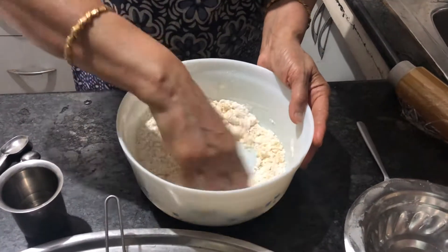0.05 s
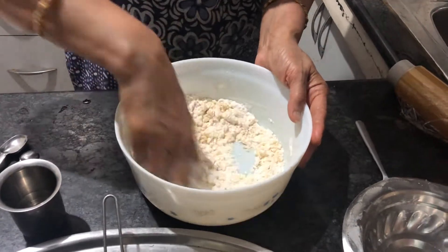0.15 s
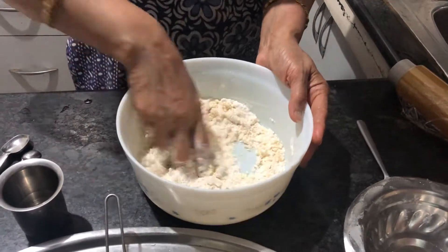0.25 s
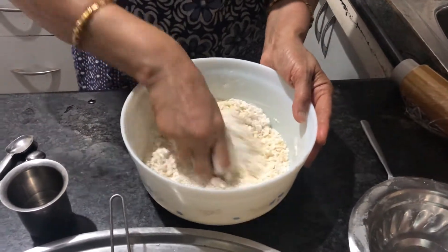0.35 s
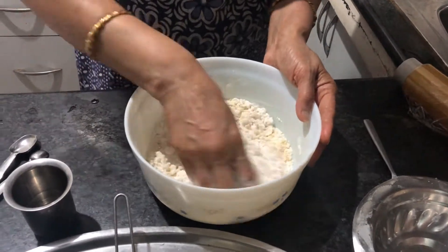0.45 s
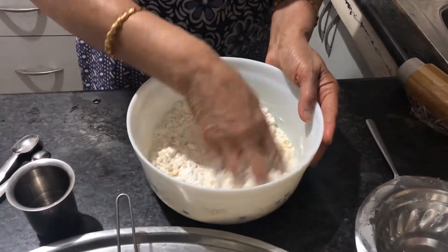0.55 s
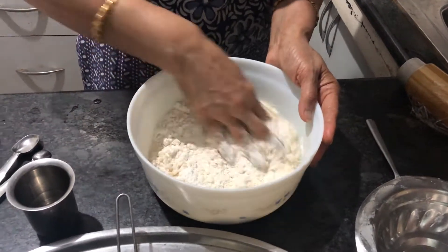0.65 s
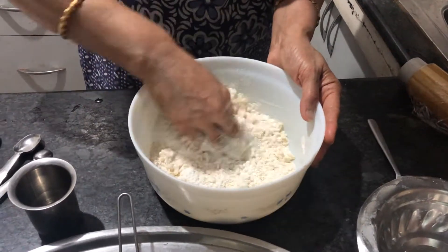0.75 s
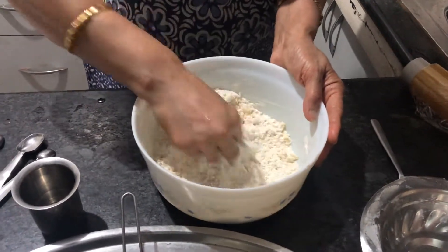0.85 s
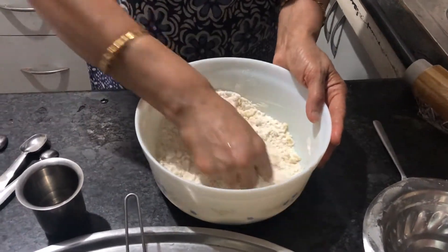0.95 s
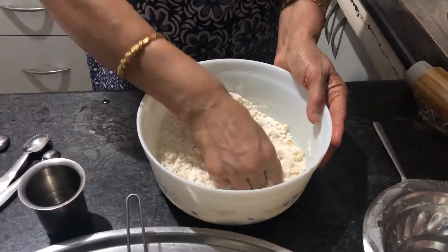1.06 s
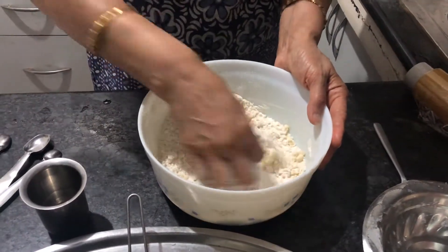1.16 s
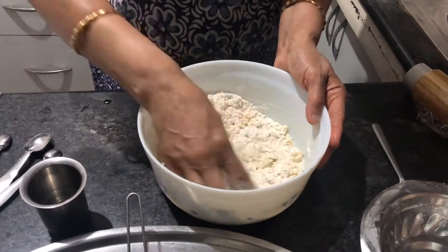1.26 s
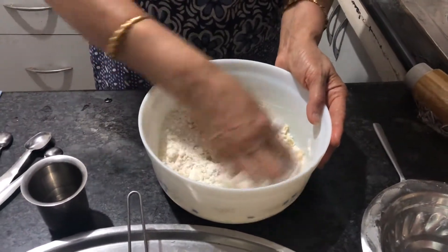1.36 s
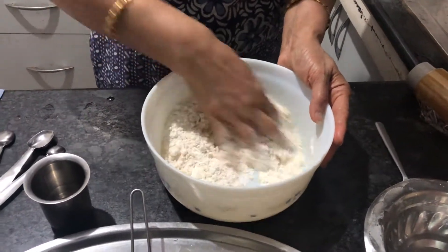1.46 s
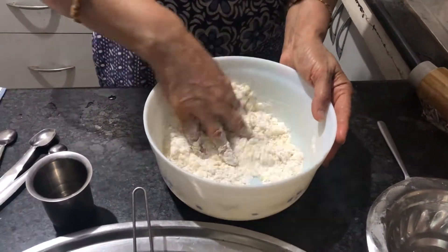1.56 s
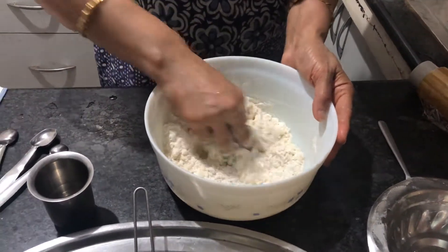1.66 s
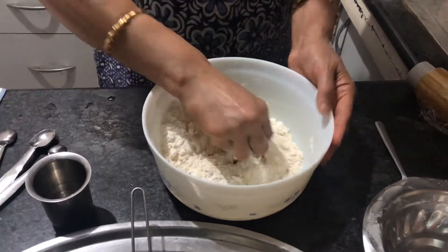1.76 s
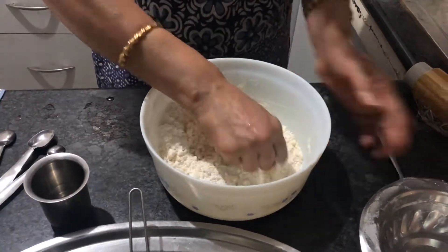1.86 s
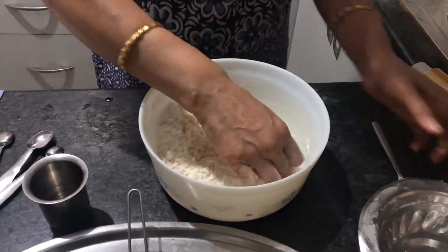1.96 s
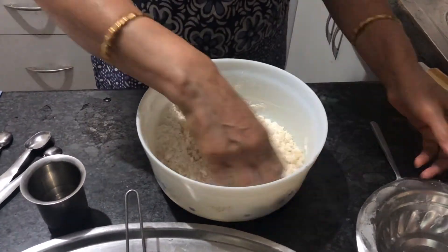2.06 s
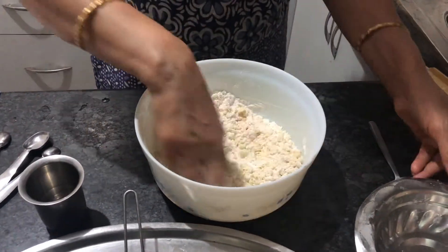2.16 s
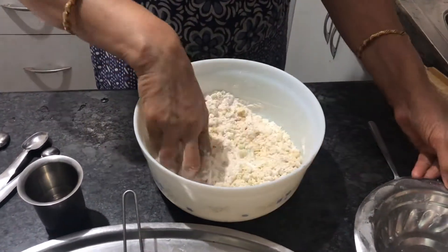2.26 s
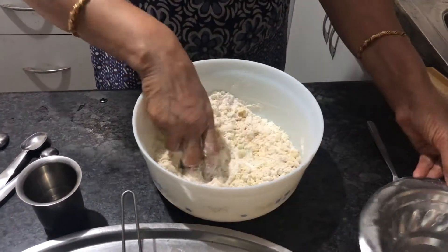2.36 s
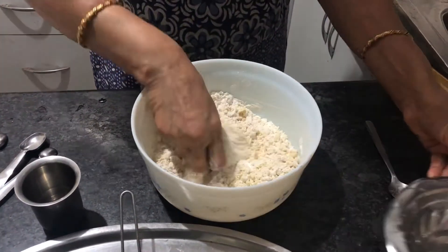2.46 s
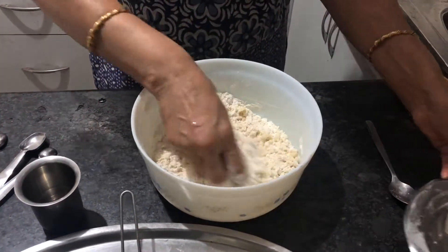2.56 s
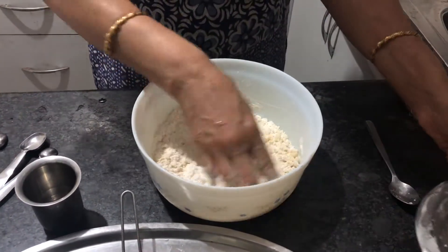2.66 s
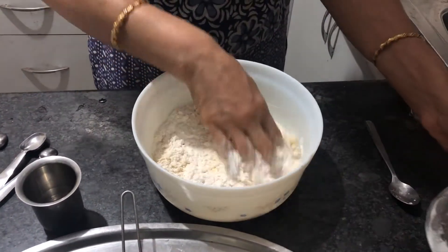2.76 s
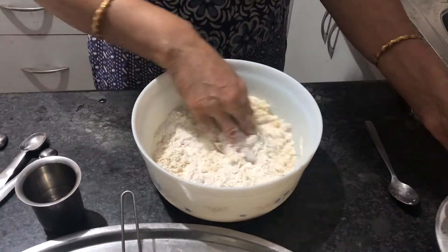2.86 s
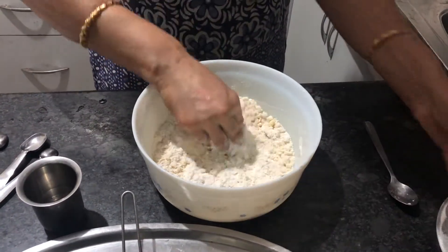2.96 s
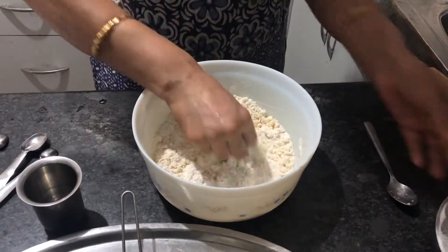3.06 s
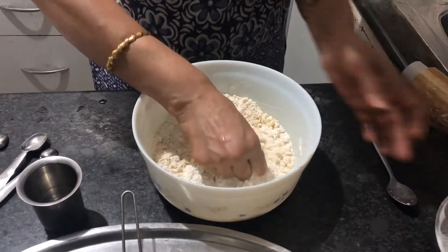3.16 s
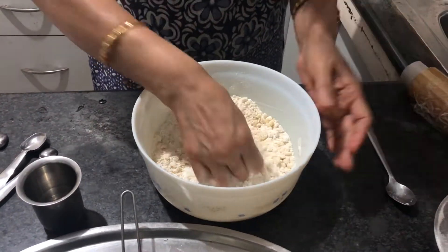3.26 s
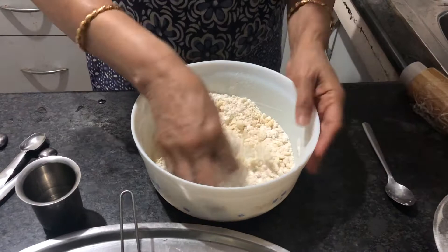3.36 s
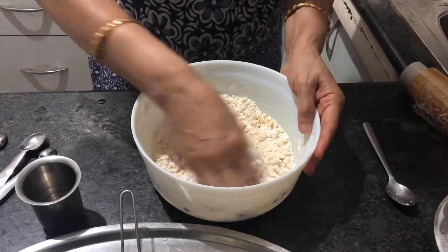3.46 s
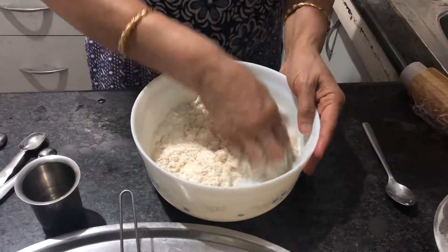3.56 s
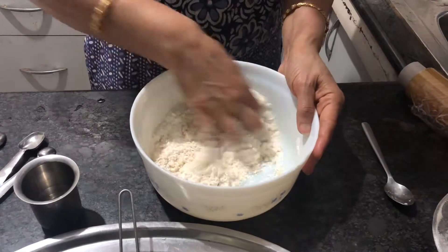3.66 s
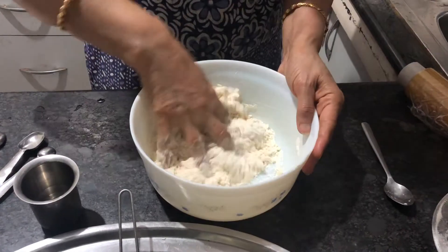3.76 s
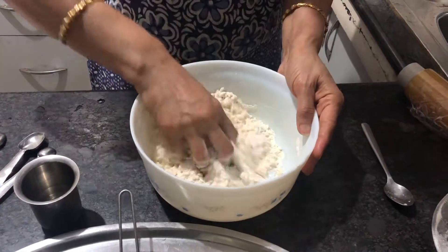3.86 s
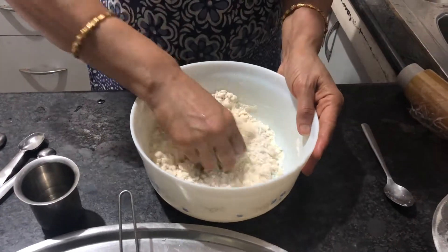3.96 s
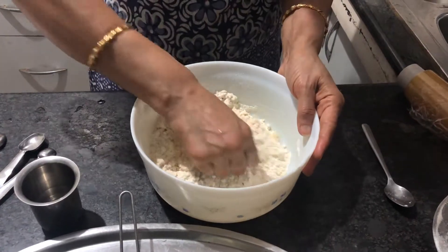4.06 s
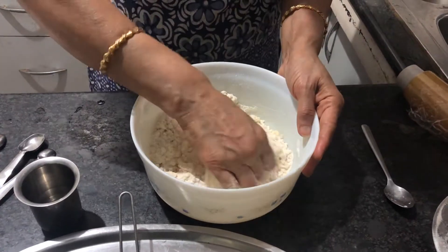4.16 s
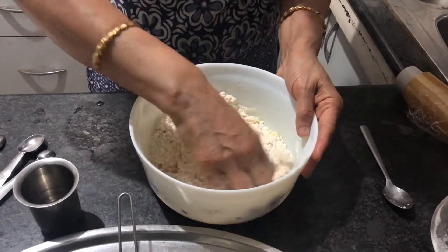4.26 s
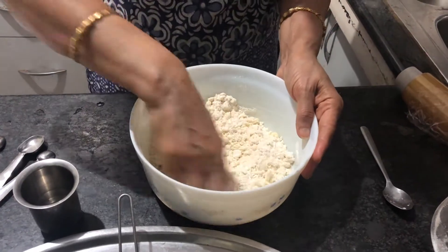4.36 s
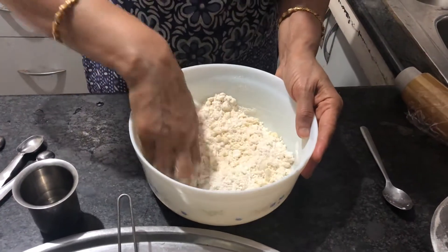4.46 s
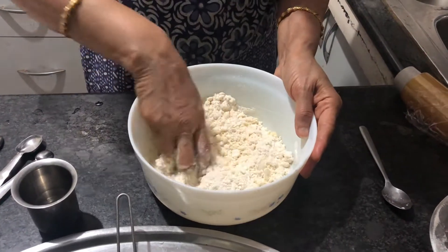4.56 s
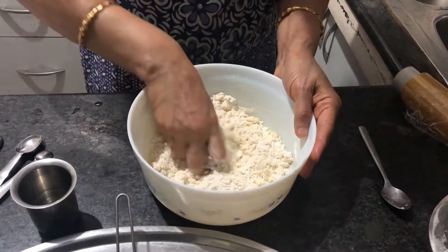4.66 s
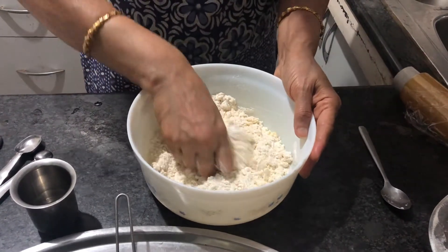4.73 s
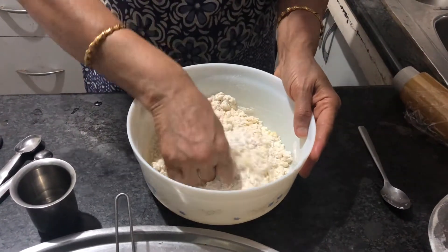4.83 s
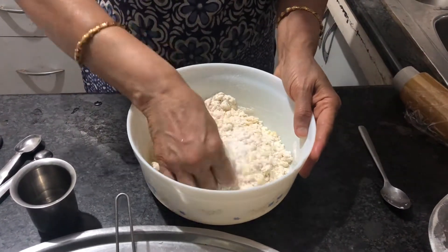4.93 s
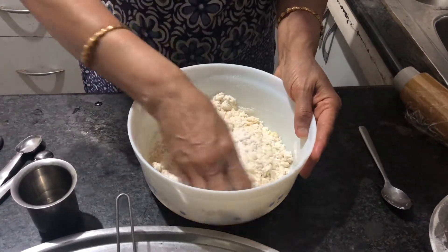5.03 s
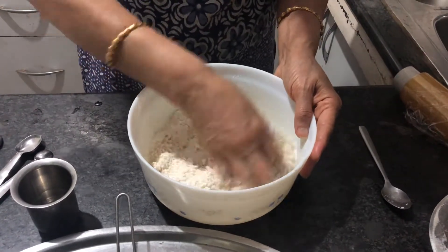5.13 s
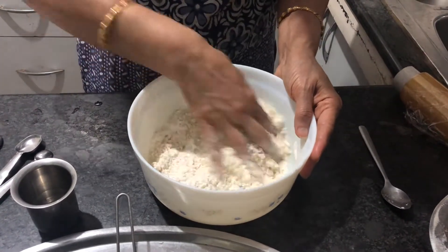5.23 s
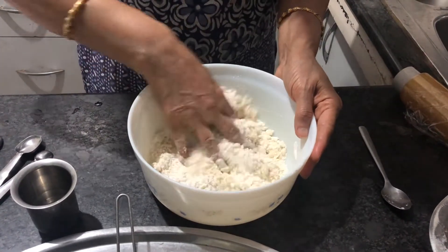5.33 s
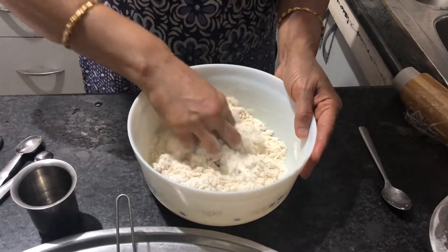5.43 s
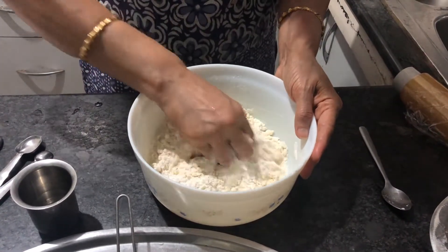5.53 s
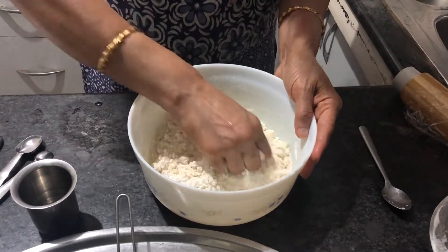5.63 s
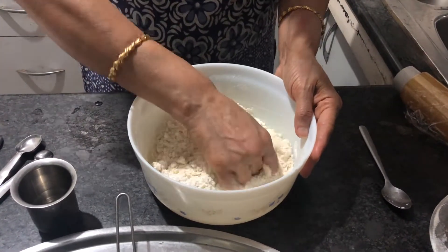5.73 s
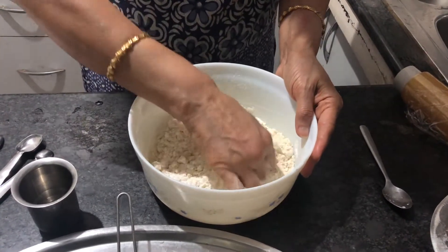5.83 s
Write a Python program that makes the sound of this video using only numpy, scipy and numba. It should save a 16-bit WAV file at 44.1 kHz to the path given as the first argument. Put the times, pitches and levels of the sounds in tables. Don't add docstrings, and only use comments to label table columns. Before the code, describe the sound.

Quiet crumbly rustling in a bowl, a sudden bright metal clank and chattering drag on a counter, then more rubbing with hard ceramic taps.

```python
import sys
import numpy as np
from scipy import signal
from scipy.fft import rfft, irfft
from scipy.io import wavfile
from numba import njit

SR = 44100
rng = np.random.default_rng(int(sys.argv[2]) if len(sys.argv) > 2 else 0)


def voltage_ratio(decibels):
    exponent = np.asarray(decibels, float) / 20
    return 10 ** exponent


def wrap_up_sound(samples):
    columns = np.atleast_2d(samples).T
    tamed = np.clip(columns, -1, 1)
    steps = np.round(tamed * 32767).astype(np.int16)
    wavfile.write(sys.argv[1], SR, steps)


N = 259749


# (time [s], hold [s], rub on the wall [dB], dry hiss over the rub [dB])
STROKES = [(0.0, 0.081, -73, -3), (0.156, 0.098, -79.5, -0.5), (0.33, .05, -86, 2), (0.6, .05, -83.5, 4.5),
           (0.683, .12, -75.5, 6), (0.935, 0.067, -80, 8.5), (1.061, .03, -88.5, 10),
           (1.241, 0.061, -81, -1.5), (1.353, 0.12, -73, 6), (1.552, .04, -68, 0.5), (1.717, .02, -68, -4),
           (1.8, 0.027, -87.5, 9.5), (2.02, .02, -88, 1.5), (2.12, .07, -85, 4.5),
           (3.018, 0.018, -80, -1.5), (3.117, 0.088, -81.5, 5), (3.381, 0.061, -73.5, -6),
           (3.479, .19, -68, 1), (3.78, .09, -66.5, 1), (3.893, 0.013, -51.5, 0.5), (4.058, 0.023, -87, 5),
           (4.351, .1, -80, 4), (4.481, 0.038, -69.5, 0), (4.57, .04, -72.5, 0.9), (4.633, .035, -63, 0.5),
           (4.83, 0.035, -90.5, 8), (5.106, 0.098, -72.5, 5.5), (5.23, 0.095, -81, -0.4),
           (5.39, 0.089, -66.5, -6), (5.5, .25, -74, -5)]
# (time [s], level [dB])
HEAP = [
    [(0.0, -69), (0.1, -67), (0.55, -73.5), (1.44, -66.5), (2.09, -71.5), (2.18, -75)],
    [(3.0, -67.5), (3.14, -77), (3.32, -76.5), (3.51, -66.5), (4.29, -72.5), (4.61, -69), (5.25, -73),
     (5.6, -64), (5.78, -70.5), (5.89, -78)],
]
# (frequency [Hz], width [Hz], level [dB])
BOWL_TONES = [(2010, 150, 1), (3390, 230, -9.5), (4194, 80, 0.5), (4980, 370, -7), (5490, 200, 0.5)]
# (frequency [Hz], width [Hz], level [dB])
GLAZE_TONES = [(6020, 180, -6), (6812, 90, 2.5), (7150, 90, -2), (7200, 100, -8), (7970, 460, -8.5),
               (7820, 46, -11.5), (8710, 760, -14.5)]
# (frequency [Hz], width [Hz], level [dB])
CRUMB_TONES = [(10470, 890, -18.5), (11300, 100, -21), (10610, 180, -6), (12020, 120, -0.5),
               (12400, 520, -5), (12500, 350, 1.5), (13500, 420, -8), (13900, 290, -4), (15000, 250, -1.5),
               (15400, 220, 8)]
# (frequency [Hz], width [Hz], level [dB])
HEAP_TONES = [(377, 40, -0.5), (490, 170, -1), (743.6, 110, -1.5), (1700, 300, -2.5), (2250, 160, -9.5),
              (2970, 690, -11.5), (5100, 970, -20)]


def flour():
    power = passes(STROKES, rise_s=0.061, sag_db_s=29, fall_s=0.092, quiet_db=-100)
    rub_db, hiss_db = np.transpose(STROKES)[2:]
    glaze_db = rub_db - 1 + 0.17 * hiss_db
    force = grit(2.2, 250) * voltage_ratio(1.5 * walk(30))
    wall = scrape(force, total_db(power, rub_db), BOWL_TONES, 4.5, 16, wander=0.025)
    glaze = scrape(force, total_db(power, glaze_db), GLAZE_TONES, 4.5, 14, wander=0.03)
    hiss = scrape(force, total_db(power, rub_db + hiss_db), CRUMB_TONES, 6.0, 30, wander=0.035)

    heap_s, heap_db = np.transpose(sum(HEAP, []))
    heap_level = np.interp(np.arange(N) / SR, heap_s, heap_db, left=-150, right=-150) - 5.0
    heap = scrape(grit(1.3, 36), heap_level, HEAP_TONES, 2.9, 16)
    return wall + glaze + hiss + heap


# (time [s], hold [s], force [dB], base contact over force [dB], wall over force [dB])
SLIDES = [
    (2.241, 0.043, -52, -7.5, -4),
    (2.334, 0.022, -43, -21, 3.5),
    (2.363, 0.024, -32.5, -4, -9),
    (2.409, 0.098, -32.5, 4.5, 0.8),
    (2.538, 0.08, -41.5, 1.5, 0),
    (2.659, .06, -48.5, -12, -6.5),
    (2.729, 0.095, -43, -17, 2),
    (2.863, 0.028, -48, -12, -9),
]
# (frequency [Hz], width [Hz], level [dB])
BASE_TONES = [(523.4, 40, -8), (603, 33, -16.5), (752, 92, -11.5), (907, 24, -8.5), (1032, 10, -4),
              (1026, 29, 4), (1085.5, 28, 6), (1233, 22, -12)]
# (frequency [Hz], width [Hz], level [dB])
WALL_TONES = [(1580, 7.7, -4.5), (1699, 97, -10), (1734.6, 20, -1.5), (1958, 37, -16)]
# (frequency [Hz], width [Hz], level [dB])
RIM_TONES = [(2470, 60, -7), (2793, 17, -19), (3262, 13, -4), (3319, 50, -2.5), (3883, 13, -6.5),
             (4283, 75, -3.5), (4513, 76, -1), (4500, 75, -6.5), (4991, 54, 1.5), (5630, 28, 0),
             (5734, 96, -3), (5850, 97, -10.5), (6290, 56, -9.5), (6220, 74, -15.5)]
# (frequency [Hz], width [Hz], level [dB])
GRIT_TONES = [(8197, 41, 0), (9330, 150, -3), (9600, 130, -16), (10400, 25, 0.5), (10860, 43, -1),
              (15500, 37, -0.5)]
# (frequency [Hz], width [Hz], level [dB])
DUST_TONES = [(4900, 2600, 0.9), (7600, 1500, -2.5), (10400, 2700, -2.5), (14000, 3000, -1.5)]
# (time [s], peak [dB], centre [Hz], spread [octaves], share of full decay [1])
CLINKS = [
    (2.207, -45, 5150, 0.056, 1),
    (2.356, -18.5, 1863, 0.36, 1.1),
    (2.361, -18.5, 4560, 0.25, 0.15),
    (2.362, -30, 2793, .05, 1.6),
    (2.874, -29.5, 1662, 0.2, 0.36),
    (2.874, -35.5, 4610, 0.24, 0.62),
    (2.918, -39.5, 1290, 0.13, 0.86),
    (2.876, -50, 3967, .03, 1.7),
]
# (frequency [Hz], time to fall 60 dB [s])
STEEL_RING = [(1280, 0.18), (1620, 0.042), (1750, 0.13), (1970, 0.087), (2793, 0.21), (3310, .15),
              (3967, 0.21), (4300, 0.2), (4548, 0.14), (5040, 0.11), (5640, 0.45)]


def dish():
    power = passes(SLIDES, rise_s=0.05, sag_db_s=22.5, fall_s=0.1, quiet_db=-87)
    start, hold, force_db, base_db, wall_db = np.transpose(SLIDES)
    grit_db = -11.5 + 9.5 * np.exp((start[0] - start) / 0.15)
    drag = slice(int(2.1 * SR), int(3.3 * SR))
    base = total_db(power, force_db + base_db)[drag]
    wall = total_db(power, force_db + wall_db)[drag]
    rim = total_db(power, force_db)[drag]
    top = total_db(power, force_db + grit_db)[drag]
    force = grit(2.0, 150, size=len(rim))
    crowd_hz = np.linspace(7150, 15600, num=30) + 150 * rng.standard_normal(size=30)
    crowd = [(hz, 45, -3) for hz in crowd_hz]

    out = blows(lasting(CLINKS, 9.0), STEEL_RING, scatter_db=2.2, thump_db=-0.38, detune=0.0016)
    out[drag] += scrape(force, base, BASE_TONES, 2.5, 14)
    out[drag] += scrape(force, wall, WALL_TONES, 1.0, 14)
    out[drag] += scrape(force, rim, RIM_TONES, 3.7, 12)
    out[drag] += scrape(force, top, GRIT_TONES + crowd, 6.0, 9)
    out[drag] += scrape(force, top - 8.5, DUST_TONES, 2.8, 48)
    return out


# (time [s], peak [dB], centre [Hz], share of full decay [1], thump length [ms])
KNOCKS = [(0.186, -57, 506, 0.66, 10), (0.357, -58.5, 484, 0.74, 6.5), (1.205, -62.5, 350, 0.69, 10),
          (1.415, -58, 586, 0.27, 12), (1.724, -47.5, 615, 0.29, 17), (1.998, -31, 564, 0.45, 15.7),
          (2.225, -28, 623, 0.57, 6.5), (2.359, -17, 960, 1.02, 6.1), (2.874, -29, 754, 0.81, 9.3),
          (3.374, -19, 630, 0.79, 9.8), (3.376, -24.5, 1048, 0.3, 7.1), (3.599, -57, 611, 0.64, 9.6),
          (3.892, -45, 664, 0.71, 6.8), (4.233, -60.5, 331, 1.14, 9.6), (4.48, -36.5, 581, 0.58, 8.7),
          (4.587, -50.5, 245, 0.42, 11.3), (4.69, -51, 587, 0.41, 5.3), (4.883, -43.5, 447, 0.45, 7.9),
          (4.955, -41.5, 496, 0.21, 11.5)]
# (frequency [Hz], time to fall 60 dB [s])
COUNTER_RING = [(250, 0.033), (340, 0.09), (431, 0.094), (479, 0.26), (554, 0.31), (630, 0.18), (690, 0.15),
                (764, 0.17), (860, 0.081), (996, 0.1), (1066, 0.04), (1130, 0.13), (1265, 0.074),
                (1389, 0.09)]


def counter_knocks():
    knocks = []
    for s, db, hz, share, ms in KNOCKS:
        spread_oct = 0.36 + 0.1 * max(db + 26.5, 0)
        knocks.append((s, db, hz, spread_oct, share, ms))
    return blows(knocks, COUNTER_RING, scatter_db=2.0, thump_db=2.2, detune=0.033)


# (time [s], peak [dB], centre [Hz], spread [octaves], share of full decay [1])
TICKS = [(0.594, -67.5, 5170, 0.099, 0.48), (1.3623, -59, 7100, 0.47, 0.27),
         (1.5825, -49, 5630, 0.17, 0.75), (1.724, -47.5, 4390, 0.15, 1), (2.223, -38, 4614, 0.15, 0.54),
         (3.365, -54.5, 4420, 0.2, 1), (3.5588, -45, 4120, 0.25, 0.38), (3.777, -53.5, 4140, 0.6, 0.97),
         (3.899, -35.5, 5480, 0.17, 0.41), (4.482, -49, 7200, 0.44, 0.57), (4.634, -60, 4250, 0.18, 0.65),
         (4.6481, -59.5, 4160, 0.16, 0.84), (5.394, -63, 4320, 0.36, 0.99)]
# (time [s], peak [dB], centre [Hz], spread [octaves], share of full decay [1])
CLACKS = [
    (1.7305, -55, 2010, 0.048, 0.92),
    (2.2244, -44, 2010, 0.14, 1),
    (3.8914, -32.5, 1950, 0.55, 0.27),
    (3.901, -25.5, 1940, 0.56, 0.56),
    (4.6638, -49, 1750, 0.38, 0.47),
]
# (frequency [Hz], time to fall 60 dB [s])
BOWL_RING = [(1728, 0.24), (1857, 0.085), (2010, 0.22), (2110, 0.043), (2750, 0.05), (4275, 0.025),
             (5680, 0.047), (6900, 0.12), (7170, 0.2), (7354, 0.072), (7900, 0.14)]


def bowl_blows():
    ticks = blows(lasting(TICKS, 3.2), BOWL_RING, scatter_db=5.2, thump_db=-7.5, detune=0.004)
    clacks = blows(lasting(CLACKS, 4.3), BOWL_RING, scatter_db=5.0, thump_db=3.9, detune=0.014)
    return ticks + clacks


# (frequency [Hz], level per Hz [dB])
AIR = [(24, -60.5), (40, -28.5), (69, -23.5), (114, -19.5), (166, -2), (235, -12.5), (761, -13.5),
       (1190, -37), (1650, -19), (2010, -16.5), (2720, -30), (3950, -28), (9700, -56), (12500, -48),
       (15600, -40)]
# (frequency [Hz], waver [dB], level [dB])
HUM = [(93.2, 3.5, -85), (148.5, 6.5, -86.5), (168.4, 2.5, -68.5), (188, 4, -82.5)]


def kitchen():
    hz, db = np.transpose(AIR)
    f = np.fft.rfftfreq(N, 1 / SR) + 1
    air = irfft(rfft(rng.standard_normal(N)) * voltage_ratio(np.interp(np.log(f), np.log(hz), db)), N)
    air = unit(air) * voltage_ratio(-71.5 + 1.3 * walk(6))
    air = signal.sosfilt(signal.butter(3, 75, "high", fs=SR, output="sos"), air)
    whine_hz, whine_width_hz = 2421, 25
    peak = signal.iirpeak(whine_hz, whine_hz / whine_width_hz, fs=SR)
    out = air + voltage_ratio(-84) * unit(signal.lfilter(*peak, rng.standard_normal(N)))
    t = np.arange(N) / SR
    for line_hz, waver_db, line_db in HUM:
        level = voltage_ratio(line_db + 1.5 + waver_db * walk(15))
        out = out + level * np.sin(2 * np.pi * line_hz * t + 0.28 * walk(4))
    return out


def room(x):
    t60_s, echo_db = 0.27, -15.5
    t = np.arange(SR // 2) / SR
    tail = rng.standard_normal(len(t)) * np.exp(-np.log(1000) * t / t60_s) * (t > 0.006)
    tail = signal.lfilter(*signal.butter(1, 2500, fs=SR), tail)
    return signal.fftconvolve(x, voltage_ratio(echo_db) * tail / np.sqrt(np.sum(tail ** 2)))[:N]


def unit(x):
    return x / np.sqrt(np.mean(x ** 2))


def walk(rate, size=N, skip=1):
    where = np.arange(0, size, skip) * rate / SR
    level = rng.standard_normal(int(size / SR * 300) + 2)
    k = where.astype(int)
    part = where - k
    step = part ** 2 * (3 - 2 * part)
    return 1.02 * (level[k] + step * (level[k + 1] - level[k]))


def grit(clump_db, clump_rate, size=N):
    return unit(rng.standard_normal(size) * voltage_ratio(clump_db * walk(clump_rate, size=size)))


STEPS_S = np.arange(0, N / SR + 0.002, 0.001)


def passes(rows, rise_s, sag_db_s, fall_s, quiet_db):
    start, hold, top_db = np.transpose(rows)[:3, :, None]
    since = STEPS_S - start
    depth = np.maximum(top_db - quiet_db, 10)
    rising = depth / rise_s * since
    held = -sag_db_s * np.minimum(since, hold) - depth / fall_s * np.maximum(since - hold, 0)
    return voltage_ratio(2 * np.maximum(np.where(since < 0, rising, held), -90))


def total_db(power, db):
    return np.interp(np.arange(N) / SR, STEPS_S, 10 * np.log10(voltage_ratio(2 * db) @ power))


def scrape(force, db, modes, drift_db, drift_rate, wander=0.0):
    gain = np.sqrt(sum(voltage_ratio(g) ** 2 * width for hz, width, g in modes) * np.pi / SR * 0.75)
    push = force * voltage_ratio(db) / gain
    out = np.zeros(len(push))
    for hz, width, g in modes:
        drift = voltage_ratio(g + drift_db * walk(drift_rate, size=len(push), skip=32))
        moving_hz = hz * (1 + wander * np.round(walk(6, size=len(push), skip=32)))
        out += resonate(push, drift, moving_hz, float(width))
    return out


@njit
def resonate(x, drive, hz, width):
    y = np.empty(len(x))
    b1, l1, b2, l2, g, k = 0., 0., 0., 0., 0., 0.
    for i in range(len(x)):
        if i % 32 == 0:
            g = np.tan(np.pi * hz[i // 32] / SR)
            k = np.pi * width / SR * (1 + g * g) / g
        v = (b1 + g * (x[i] * drive[i // 32] - l1)) / (1 + g * (g + k))
        b1, l1 = 2 * v - b1, l1 + 2 * g * v
        u = (b2 + g * (k * v - l2)) / (1 + g * (g + 3 * k))
        b2, l2 = 2 * u - b2, l2 + 2 * g * u
        y[i] = 3 * k * u
    return y


def lasting(events, ms):
    return [(*row, ms) for row in events]


def blows(events, modes, scatter_db, thump_db, detune):
    out, t = np.zeros(N + SR), np.arange(SR // 2) / SR
    hz, t60 = np.transpose(modes)[:, :, None]
    for s, db, centre_hz, spread_oct, share, ms in events:
        luck = rng.standard_normal((2, len(modes), 1))
        nearness = np.exp(-0.5 * (np.log2(hz / centre_hz) / spread_oct) ** 2)
        weight = nearness * voltage_ratio(scatter_db * luck[0])
        decay = np.exp(-np.log(1000) * t / (share * t60))
        tones = decay * np.sin(2 * np.pi * hz * (1 + detune * luck[1]) * t)
        rattle = voltage_ratio(3.0 * walk(35, size=len(t) * len(modes), skip=50))
        tones = tones * np.repeat(rattle, 50).reshape(tones.shape)
        onset = np.sin(np.pi / 2 * np.clip(t / 0.0039, 0, 1)) ** 2
        ring = (weight * tones).sum(axis=0) * onset
        bump = np.sin(np.pi * np.clip(t * 1000 / ms, 0, 1) ** 0.7) ** 2
        thump = bump * np.sin(2 * np.pi * centre_hz * t)
        y = ring / np.abs(ring).max() + voltage_ratio(thump_db) * thump
        k = int(s * SR)
        out[k:k + len(t)] += voltage_ratio(db) * y / np.abs(y).max()
    return out[:N]


def scene():
    near = flour() + dish() + counter_knocks() + bowl_blows()
    near = signal.sosfilt(signal.butter(2, 170, "high", fs=SR, output="sos"), near)
    return (near + room(near) + kitchen())[None]


def low_pass(x):
    return signal.sosfilt(signal.butter(12, 15740, fs=SR, output="sos"), x)


def record(dry):
    mix = signal.sosfilt(signal.ellip(8, 0.2, 60, 15700, fs=SR, output="sos"), dry)
    return low_pass(mix)


dry = scene()
out = record(dry)
wrap_up_sound(out)
```